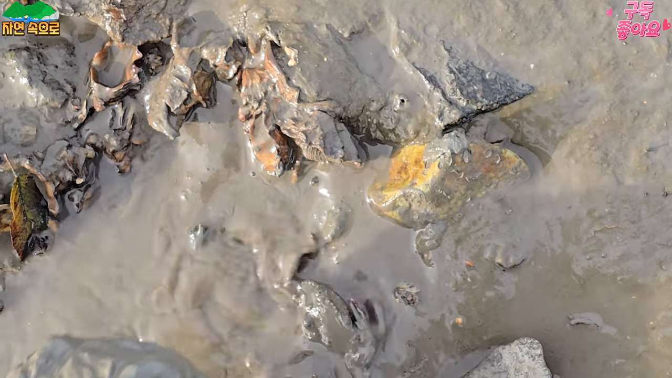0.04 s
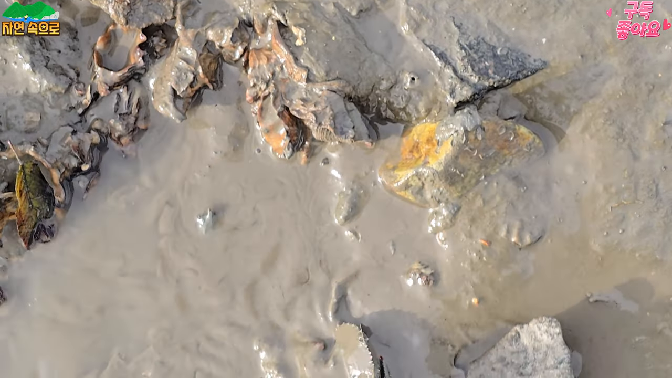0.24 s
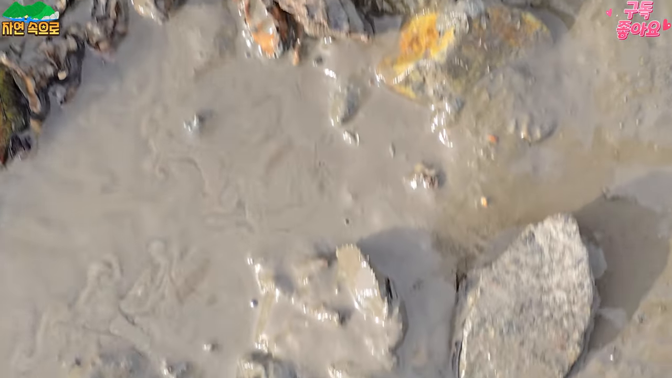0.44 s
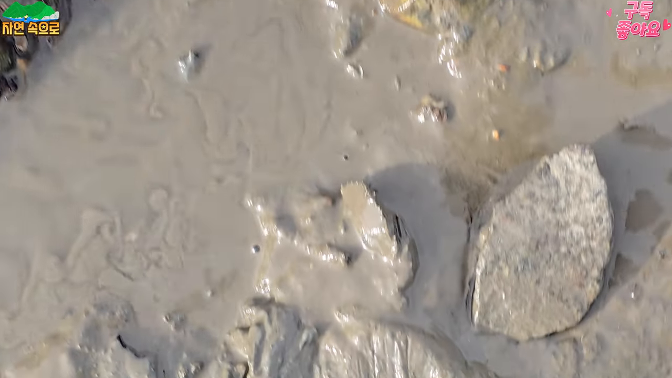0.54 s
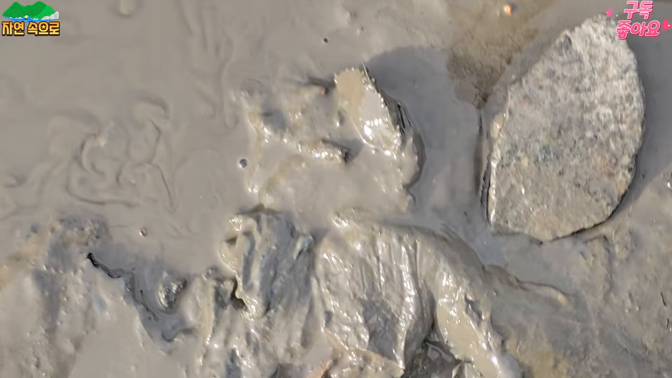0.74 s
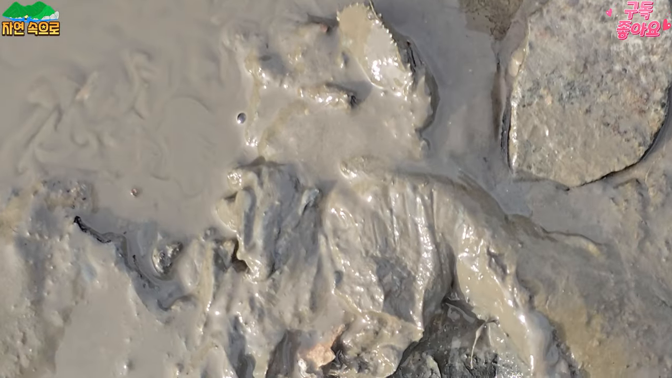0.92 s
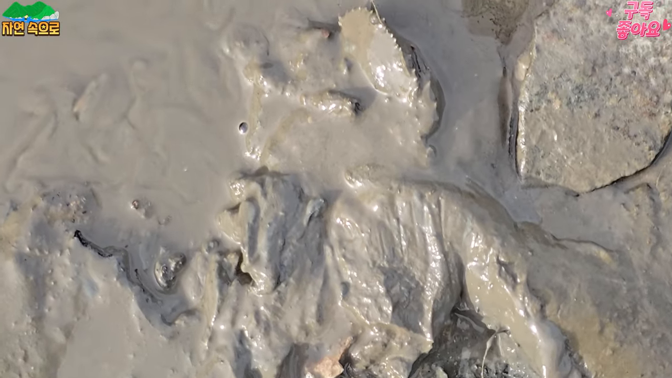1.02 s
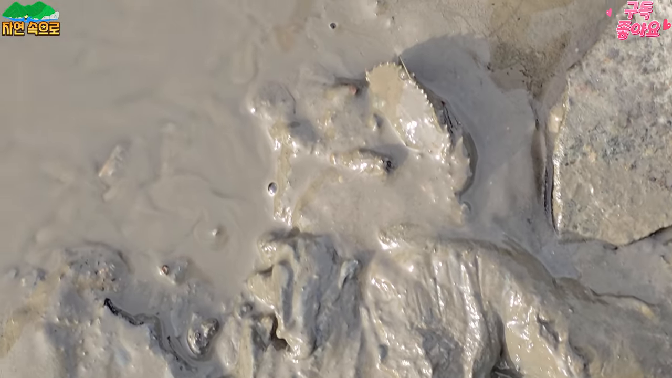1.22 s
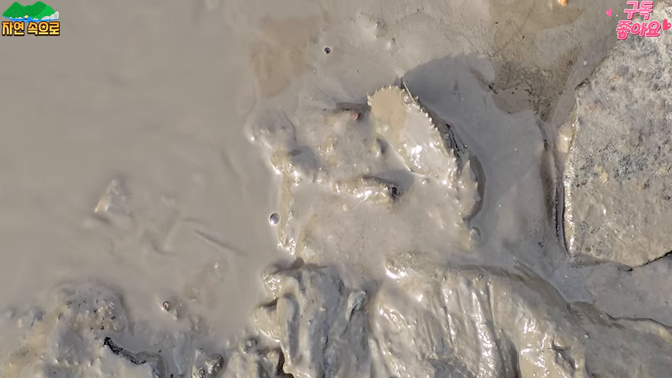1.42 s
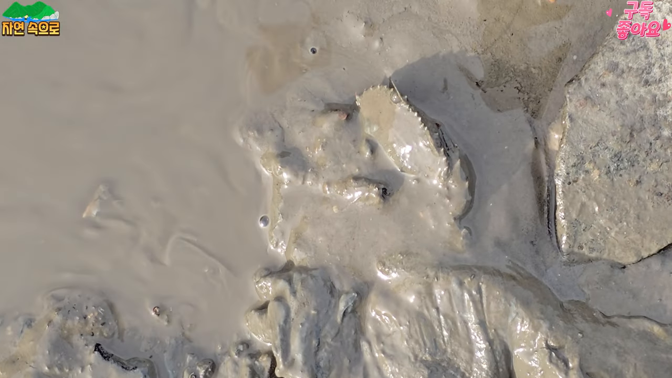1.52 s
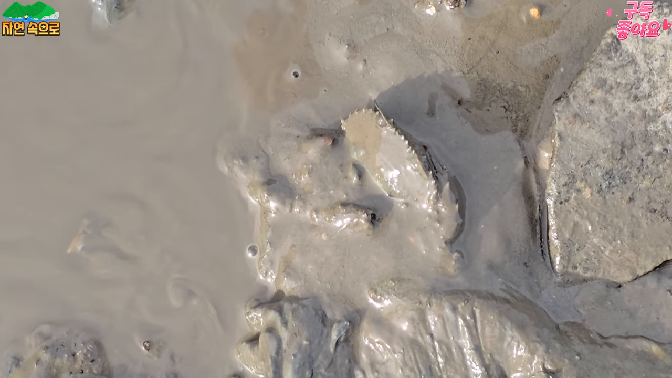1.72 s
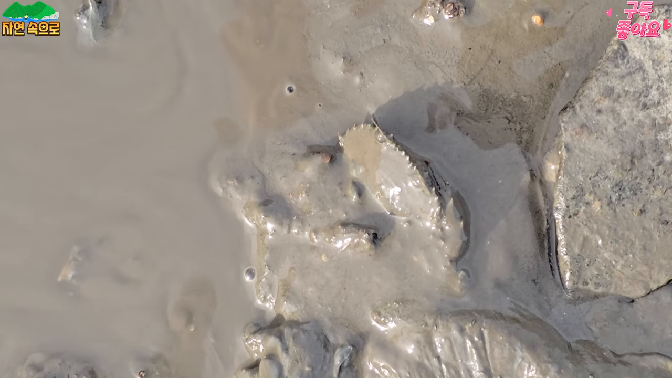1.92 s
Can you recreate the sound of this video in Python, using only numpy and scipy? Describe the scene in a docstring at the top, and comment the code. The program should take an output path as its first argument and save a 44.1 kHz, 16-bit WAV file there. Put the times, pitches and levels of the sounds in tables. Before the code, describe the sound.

Wet tidal mud pops and squelches close up at about half a second and again soon after, over faint trickling and fizzing water; wind thumps the left side, then a short air blast leaves a steady hiss.

```python
"""Air pockets pop in wet tidal mud, in two squelching clusters: short rising rings with puffs of spray.
Trickling water is many faint bubbles in soft noise; slosh and fizz are coloured noise and random clicks.
Gusts are swelling noise and eddies are single pulses that briefly overload the left microphone port.
Grit ticks as very short rings; a sharp blast of noise leads to a steady hiss over a low drone."""
import sys
import numpy as np
from scipy import signal
from scipy.fft import rfft, irfft
from scipy.io import wavfile
from scipy.ndimage import uniform_filter1d

SR = 44100
rng = np.random.default_rng(int(sys.argv[2]) if len(sys.argv) > 2 else 0)


def bounce(signal):
    """Save signal as a 16-bit WAV file at the path given by the first command-line argument."""
    frames = np.transpose(np.atleast_2d(signal))
    limited = np.clip(frames, -1, 1)
    pcm = np.round(limited * 32767).astype(np.int16)
    wavfile.write(sys.argv[1], SR, pcm)


N = 88200
T = np.arange(N) / SR  # time in seconds

# How fast a pop sounds up (seconds), and how fast its pitch climbs (share of the pitch per second)
POP_RISE_S, POP_GLIDE_PER_S = 0.00037, 2.5


def amp(db):
    """Turns decibels into a multiplier for the wave."""
    return 10 ** (np.asarray(db) / 20)


def unit(x):
    """Scales a sound to an average (rms) strength of 1."""
    return x / np.sqrt(np.mean(x ** 2) + 1e-20)


def level(rows, axis=1):
    """Draws a smooth loudness curve over time from one dB column of a table."""
    rows = np.array(rows)
    return amp(np.interp(T, rows[:, 0], rows[:, axis]))


def colour(x, spectrum):
    """Makes some pitches of a sound stronger and others weaker, then scales it to rms 1."""
    hz, db = np.transpose(spectrum)
    bin_hz = np.fft.rfftfreq(N, 1 / SR)
    gain = amp(np.interp(np.log(bin_hz + 1), np.log(hz), db))
    return unit(irfft(rfft(x) * gain, N))


def noise(spectrum):
    """Makes random noise with the given balance of pitches, at rms 1."""
    return colour(rng.standard_normal(N), spectrum)


def clicks(per_s, spread_db):
    """Scatters single-sample clicks of uneven size and random sign."""
    size_db = np.minimum(spread_db * rng.exponential(1, N), 15)
    happens = rng.random(N) < per_s / SR
    return happens * rng.choice([-1, 1], N) * amp(size_db)


def blend(smooth, grains, share):
    """Mixes two sounds; share is the part of the power given to the second."""
    share = np.clip(share, 0, 1)
    return np.sqrt(1 - share) * unit(smooth) + np.sqrt(share) * unit(grains)


def add(mix, s, sound, pan_db):
    """Adds a sound at time s, turning down the right side if pan_db is positive, else the left."""
    part = mix[:, round(s * SR):][:, :len(sound)]
    sides = amp([[min(pan_db, 0)], [min(-pan_db, 0)]])
    part += sides * sound[..., :part.shape[1]]


def decay(t, t60):
    """Fades away steadily, by 60 dB in t60 seconds."""
    return np.exp(-np.log(1000) * t / t60)


def bubble(hz, t60, rise_s, glide):
    """An air pocket rings briefly; a positive glide raises its pitch as it opens."""
    t = T[:int(t60 * SR * 2)]
    shape = (1 - np.exp(-(t / rise_s) ** 2)) * decay(t, t60)
    ring = np.sin(2 * np.pi * hz * (t + glide * t ** 2 / 2))
    return shape / shape.max() * ring


def trickle(shared=0.24):
    """Many small, faint bubbles ring in a soft wash, partly common to both ports."""
    # Each row: time in seconds, left level in dB, right level in dB.
    trickle_curve = [(0, -46.5, -53), (.1, -46.5, -44.5), (.145, -44.5, -45.5), (.22, -41, -56),
                     (.45, -53, -55.5), (.57, -43, -44.5), (.68, -44, -42), (.77, -43.5, -47),
                     (.85, -42, -44), (.97, -42, -39), (1.08, -42.5, -41.5), (1.25, -46.5, -48),
                     (1.5, -45.5, -45), (1.7, -50, -47), (1.8, -47.5, -46), (1.88, -49.5, -48),
                     (2, -56, -45)]
    # Balance of pitches in the water. Each row: pitch in Hz, relative level in dB.
    trickle_tone = [(20, -34), (70, 3.5), (130, -1.5), (230, 2), (600, 1), (1000, -2), (1500, -1.5),
                    (1950, -5.5), (3000, -17), (8000, -42)]
    bubbles_per_s, fade_cycles, bubble_share = 260, 16.8, 0.5  # a bubble fades 60 dB in fade_cycles

    def stream(count=16):
        """Bubbles at many pitches, mixed with smooth noise."""
        grains = np.zeros(N)
        for hz in np.linspace(280, 1700, count) * rng.uniform(0.92, 1.053, count):
            ring = bubble(hz, fade_cycles / hz, 1 / hz, 6.6) * np.sqrt(hz)
            grains += signal.oaconvolve(clicks(bubbles_per_s / count, 1.7), ring)[:N]
        return blend(noise(trickle_tone), colour(grains, trickle_tone), bubble_share)

    common = stream()
    return np.array([blend(stream(), common, shared) * level(trickle_curve, axis=c) for c in (1, 2)])


def crackle_noise():
    """Many uneven clicks crackle over a little smooth noise."""
    crackles_per_s, spread_db, click_share = 3400, 5.5, 0.9
    return blend(rng.standard_normal(N), clicks(crackles_per_s, spread_db), click_share)


def slosh(right_db=-14):
    """Water slides over the mud, mostly on the left: crackling noise that swells and sinks."""
    # Each row: time in seconds, level on the left in dB.
    slosh_curve = [(0, -56), (.4, -57), (.445, -28), (.49, -51), (.54, -54.5), (.59, -38.5), (.665, -28.5),
                   (.72, -37), (.785, -42.5), (.81, -35.5), (.88, -46), (1, -60), (1.17, -66), (1.38, -54),
                   (2, -74)]
    # Balance of pitches in the sliding water. Each row: pitch in Hz, relative level in dB.
    slosh_tone = [(300, -32), (1200, -4.5), (2000, 5), (3300, 4.5), (4500, -4), (6000, -15), (9000, -29),
                  (12000, -26), (16000, -51)]
    water = colour(crackle_noise(), slosh_tone) * level(slosh_curve)
    return np.array([water, amp(right_db) * water])


def fizz(left_db=-24, count=14):
    """Tiny bubbles crackle and ring, mostly on the right, under a flickering treble."""
    # Each row: time in seconds, level of the main crackle in dB, level of the treble before flicker in dB.
    fizz_curve = [(0, -42, -52), (.1, -40.5, -52), (.16, -39, -43.5), (.24, -44, -52), (.41, -47.5, -52),
                  (.465, -34.5, -35.5), (.53, -37.5, -45.5), (.6, -42.5, -43), (.66, -42, -39),
                  (.72, -45.5, -51), (.83, -46, -57), (1.05, -46.5, -61), (1.25, -50.5, -71.5),
                  (1.55, -54, -59.5), (1.78, -53.5, -69), (2, -52, -71)]
    # Balance of pitches in the main fizz. Each row: pitch in Hz, relative level in dB.
    fizz_tone = [(400, -20), (1200, -1), (2100, -3.5), (2900, 0.5), (4000, 5), (4900, 6), (5800, -1.5),
                 (7000, -13.5), (9000, -67.5), (16000, -73)]
    # Balance of pitches in its treble. Each row: pitch in Hz, relative level in dB.
    treble_tone = [(6000, -52), (9000, -39), (10800, -19.5), (12000, -1), (14500, -5), (16000, 1)]
    prickles_per_s, prickle_db, prickle_t60, spread_db = 120, -7.5, 0.0082, 1.5
    flicker_db, flicker_s = 2.5, 0.0083  # rms depth, and time over which it is smoothed

    crackle = crackle_noise()
    wobble = uniform_filter1d(rng.standard_normal(N), int(flicker_s * SR))
    flicker = amp(flicker_db * unit(wobble))
    prickle = np.zeros(N)
    for hz in np.linspace(1800, 6000, count):
        ring = bubble(hz, prickle_t60, POP_RISE_S, POP_GLIDE_PER_S)
        prickle += signal.oaconvolve(clicks(prickles_per_s / count, spread_db), ring)[:N]
    body = colour(crackle, fizz_tone) + amp(prickle_db) * colour(prickle, fizz_tone)
    treble = colour(crackle, treble_tone) * level(fizz_curve, axis=2) * flicker
    foam = body * level(fizz_curve) + treble
    return np.array([amp(left_db) * foam, foam])


def rumble():
    """Wind rumbles as separate low noise in each port; the right one is sheltered."""
    # Each row: time in seconds, left level in dB, right level in dB.
    rumble_curve = [(0, -41, -41), (.008, -31, -21.5), (.05, -25.5, -43), (.13, -28.5, -53), (.2, -17, -53),
                    (.25, -5.5, -60), (.31, -10, -40), (.37, -11, -39), (.44, -25.5, -50), (.5, -65, -57),
                    (.77, -81, -62), (.81, -67, -54), (1.165, -82, -65), (1.22, -18, -41),
                    (1.34, -22.5, -58), (1.39, -14.5, -61), (1.47, -23.5, -62), (1.51, -61, -52),
                    (2, -64, -47)]
    # Balance of pitches in the rumble. Each row: pitch in Hz, relative level in dB.
    rumble_tone = [(10, -3), (25, 16.5), (42, 0), (70, 6.5), (120, -15), (250, -16), (600, -70),
                   (2000, -76)]
    return np.array([noise(rumble_tone) * level(rumble_curve, axis=c) for c in (1, 2)])


def gusts():
    """Gusts buffet the left port: each is noise that swells and dies away."""
    # Each row: time of the peak in seconds, level in dB, rise in seconds, fall in seconds,
    # centre pitch in Hz, dullness in dB lost per octave above the centre.
    gust_rows = [(0.197, -19, 0.011, 0.011, 108, 11), (.212, -27.5, 0.022, 0.0071, 320, 4.5),
                 (0.23, -9.5, 0.0097, 0.01, 302, 2), (0.2746, -7.5, 0.0013, 0.0017, 910, 14.5),
                 (0.326, -9.5, 0.0089, 0.015, 285, 3), (.42, -19, 0.0078, 0.0075, 280, 2.5),
                 (1.177, -18.5, 0.013, 0.035, 257, 10), (1.236, -28, 0.006, 0.014, 248, 3),
                 (1.257, -24.5, 0.0079, 0.011, 240, 12.5), (1.392, -25, 0.0056, 0.03, 222, 6.5),
                 (1.451, -13, 0.0059, 0.012, 364, 4), (1.59, -27, 0.0079, 0.011, 390, 12)]
    # Balance of pitches in a gust before dulling.
    # Each row: pitch as a multiple of the centre, relative level in dB.
    gust_tone = [(.1, -23), (.35, -23), (.6, -0.5), (1.1, -3), (1.9, -2), (3, -7.5), (4.5, -9), (7, -35),
                 (14, -38), (36, -69)]
    left = np.zeros(N)
    for s, db, rise, fall, hz, dull_db in gust_rows:
        swell = np.exp(-np.maximum((s - T) / rise, (T - s) / fall))
        tone = [(hz * k, d - dull_db * max(np.log2(k), 0)) for k, d in gust_tone]
        left += amp(db) * swell * noise(tone)
    return np.array([left, np.zeros(N)])


def eddies():
    """Single swirls of air thump the left port: each is one lopsided pressure pulse."""
    # Each row: time of the middle in seconds, level in dB, width scale in seconds.
    eddy_rows = [(0.2279, 2, 0.0013), (0.2351, 11.5, 0.0011), (0.2364, 8.5, 0.0027), (0.255, 2, 0.0072),
                 (0.275, 3.5, 0.00092), (0.3253, -1, 0.00084), (0.3326, -2.5, 0.0019),
                 (0.4156, -9.5, 0.0011), (0.424, -10, 0.0023), (1.181, -9, 0.00078), (1.1938, -8.5, 0.0012),
                 (1.2071, -3.5, 0.00093), (1.252, -11, 0.00086), (1.27, -16, 0.0008), (1.385, -6.5, 0.0011),
                 (1.3945, -15, 0.009), (1.407, -12.5, 0.0019), (1.446, -2.5, 0.0011)]
    lean = 0.99  # makes the pulse lopsided
    left = np.zeros(N)
    for s, db, width in eddy_rows:
        u = (T - s) / width
        left += amp(db) * (1 + lean * u - u ** 2) * np.exp(-u ** 2 / 2)
    return np.array([left, np.zeros(N)])


def pops():
    """Pockets burst with a rising ring and a puff of spray, and set off smaller neighbours."""
    # Each row: start in seconds, starting pitch in Hz, peak level of the ring in dB on its louder side,
    # time for the ring to fade 60 dB in seconds, left minus right in dB.
    pop_rows = [(.0568, 4920, -20, 0.019, -33.5), (.1461, 4700, -26.5, 0.015, -29),
                (.183, 4420, -24.5, 0.01, -27), (.1935, 4780, -24, .012, -29),
                (.2848, 5264, -22, 0.023, -31), (.4488, 1460, -8, 0.017, 4.5),
                (.4497, 4610, 3, 0.0038, -41), (.4516, 3750, -8.5, 0.0085, -34),
                (.4525, 1975, -6, 0.015, -9), (.4591, 4700, -17, 0.0075, -25),
                (.4627, 4480, -19, 0.017, -22), (.4662, 5100, -18, 0.02, -25),
                (.4762, 1990, -17.5, 0.014, -8), (.4848, 3850, -25, .01, -27), (.6311, 1830, -21, .012, 9),
                (.6476, 2060, -21, .012, 13), (.6527, 2190, -14, 0.036, -5), (.6567, 2210, -4, 0.022, 14),
                (.6534, 5370, -19.5, .012, -12), (.6570, 4070, -7.5, 0.012, 1.5),
                (.6600, 2070, -24, 0.013, -5), (.6714, 2350, -18, 0.02, 5), (.6784, 5380, -2, .007, -15),
                (.7674, 5580, -16, 0.0047, -27), (.7678, 7380, -30, 0.008, -9),
                (.8061, 2280, -25.5, .014, 15), (1.6881, 3400, -24, 0.0037, 7)]
    # Balance of pitches in the spray on the right. Each row: pitch in Hz, relative level in dB.
    spray_right = [(300, -22), (1200, -15), (3000, -6), (5000, 0), (6500, -9.5), (9000, -41), (12000, -15),
                   (16000, -14)]
    # The same on the left, where it is duller. Each row: pitch in Hz, relative level in dB.
    spray_left = [(300, -20), (1200, -4), (2500, -5), (4000, -1), (6000, -13), (9000, -28), (12000, -30),
                  (16000, -33)]
    spray_db, spray_t60 = -16, .016  # level is relative to the pop
    neighbour_db, neighbour_detune, neighbour_lag_s = -13, 0.18, .004  # largest detune and lag

    out, t = np.zeros((2, N)), T[:SR // 20]
    spray = np.array([noise(spray_left), noise(spray_right)])
    puff_shape = np.minimum(t / POP_RISE_S, 1) * decay(t, spray_t60)
    for s, hz, db, t60, pan_db in pop_rows:
        puff = np.roll(spray, -round(s * SR), axis=1)[:, :len(t)] * puff_shape
        add(out, s, amp(db) * bubble(hz, t60, POP_RISE_S, POP_GLIDE_PER_S), pan_db)
        add(out, s, amp(db + spray_db) * puff, pan_db)
        for lag, detune in rng.random(size=(3, 2)):
            near_hz = hz * (1 + neighbour_detune * (2 * detune - 1))
            ring = bubble(near_hz, t60 / 2, POP_RISE_S, POP_GLIDE_PER_S)
            add(out, s + lag * neighbour_lag_s, amp(db + neighbour_db) * ring, pan_db)
    return out


def spits():
    """Tiny high spits of spray: short bursts of noise in a narrow range of pitches."""
    # Each row: start in seconds, pitch in Hz, level of the noise before shaping in dB on its louder side,
    # time to fade 60 dB in seconds, left minus right in dB.
    spit_rows = [(.6268, 14600, -29, .006, -32), (0.651, 12500, -22.5, 0.0078, -17),
                 (0.6544, 14500, -29, 0.0045, -16), (0.778, 12100, -41, 0.024, -25),
                 (0.785, 10600, -34.5, 0.0069, -13), (0.98, 10200, -39.5, 0.0055, -10),
                 (1.689, 7040, -35, 0.0063, 12)]
    out, t = np.zeros((2, N)), T[:SR // 20]
    for s, hz, db, t60, pan_db in spit_rows:
        # the crossed last two points make a sudden upper edge
        band = [(hz * 0.71, -40), (hz * 0.92, 0), (hz * 1.12, 0), (hz * 1.1, -40)]
        spit = noise(band)[:len(t)] * np.minimum(t / POP_RISE_S, 1) * decay(t, t60)
        add(out, s, amp(db) * spit, pan_db)
    return out


def gurgles():
    """Deeper pockets gurgle: lower, mostly longer rings that start more softly."""
    # Each row: start in seconds, starting pitch in Hz, peak level in dB on its louder side,
    # time to fade 60 dB in seconds, left minus right in dB.
    gurgle_rows = [(.682, 326, -31, 0.14, -3.5), (.712, 477.5, -38.5, 0.14, 1),
                   (.845, 223, -37.5, 0.27, -10), (1.766, 606, -32, 0.026, -2.5),
                   (1.766, 300, -32, 0.065, -1), (1.791, 250, -40, .06, 0), (1.819, 291, -36.5, 0.14, 0)]
    rise_s, glide_per_s = 0.0022, 2
    out = np.zeros((2, N))
    for s, hz, db, t60, pan_db in gurgle_rows:
        add(out, s, amp(db) * bubble(hz, t60, rise_s, glide_per_s), pan_db)
    return out


def mud():
    """Pops, spits and gurgles reach the right port slightly late; nearby stones scatter them."""
    port_delay_s, scatter_db, scatter_t60 = 0.00014, -11, 0.042
    out = pops() + spits() + gurgles()
    # turning the phase of each pitch delays the right side by a fraction of a sample as well
    turn = np.exp(-2j * np.pi * np.fft.rfftfreq(N, 1 / SR) * port_delay_s)
    out[1] = irfft(rfft(out[1]) * turn, N)
    tail = rng.standard_normal((2, SR // 4)) * decay(T[:SR // 4], scatter_t60)
    tail = tail / np.linalg.norm(tail[0])
    return out + amp(scatter_db) * signal.fftconvolve(out, tail, axes=1)[:, :N]


def grit():
    """Grit and bits of shell tick: very short rings of steady pitch."""
    # Each row: start in seconds, pitch in Hz, peak level in dB on its louder side,
    # time to fade 60 dB in seconds, left minus right in dB.
    tick_rows = [(0.142, 950, -21, 0.003, -8), (0.526, 1080, -22.5, 0.0032, 13),
                 (0.7495, 4000, -20, 0.001, 17), (0.6783, 4200, -9.5, 0.0014, 4.5),
                 (0.885, 4460, -32, 0.0025, 10), (1.4427, 2500, -10, 0.0013, 33),
                 (1.4915, 3900, -11, 0.0037, 32)]
    out = np.zeros((2, N))
    for s, hz, db, t60, pan_db in tick_rows:
        add(out, s, amp(db) * bubble(hz, t60, .0001, 0), pan_db)  # rise in seconds, no glide
    return out


def hiss(right_db=-28):
    """Air hisses past the left port as noise: one short, sinking blast, then a steady flow."""
    # Each row: time in seconds, level of the hiss on the left in dB.
    hiss_curve = [(0, -76), (1.37, -87.5), (1.42, -40), (1.51, -39.5), (1.56, -42.5), (1.595, -34.5),
                  (1.62, -44), (1.8, -43.5), (2, -43)]
    # Balance of pitches in the hiss. Each row: pitch in Hz, relative level in dB.
    hiss_tone = [(30, 8), (130, -10), (250, 7), (600, 9), (1200, -1), (2200, 4), (3500, 0), (5000, 1.5),
                 (6500, -11.5), (9000, -36), (12500, -25), (16000, -66)]
    # Balance of pitches in the blast. Each row: pitch in Hz, relative level in dB.
    blast_tone = [(150, 11.5), (600, 5.5), (1200, -6), (2500, -4.5), (4000, 0), (5500, -10), (8500, -24.5),
                  (10500, -38), (16000, -45)]
    blast_s, length_s, edge_s = 1.4442, .048, 0.0009
    blast_db, sag_db_per_s = -17.5, 97  # level at the start on the left, then how fast it sinks

    t = T - blast_s
    gate = np.clip(np.minimum(t, length_s - t) / edge_s + .5, 0, 1)
    burst = gate * amp(blast_db - sag_db_per_s * np.clip(t, 0, length_s))
    air = noise(hiss_tone) * level(hiss_curve) + noise(blast_tone) * burst
    return air * np.array([[1], [amp(right_db)]])


def drone(right_db=-7):
    """A low drone fades in under the hiss: separate deep noise on each side, weaker on the right."""
    # Balance of pitches in the drone. Each row: pitch in Hz, relative level in dB.
    drone_tone = [(30, -33), (70, -5.5), (100, -2), (135, 0), (175, -11), (400, -26), (2000, -60)]
    from_s, fade_s, left_db = 1.56, 0.041, -42.5
    sides = np.array([noise(drone_tone), amp(right_db) * noise(drone_tone)])
    return amp(left_db) * np.clip((T - from_s) / fade_s, 0, 1) * sides


def scene():
    """Water, wind, mud, grit and hissing air sound together."""
    water = trickle() + slosh() + fizz()
    wind = rumble() + gusts() + eddies()
    return water + wind + mud() + grit() + hiss() + drone()


def record(dry):
    """The recorder clips at full scale, then removes the highest pitches."""
    edge_hz = 16100
    low_pass = signal.firwin(401, edge_hz, window=("kaiser", 9), fs=SR)
    return signal.oaconvolve(np.clip(dry, -1, 1), low_pass[None], "same")


dry = scene()
out = record(dry)
bounce(out)
```